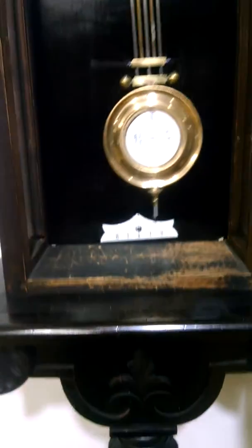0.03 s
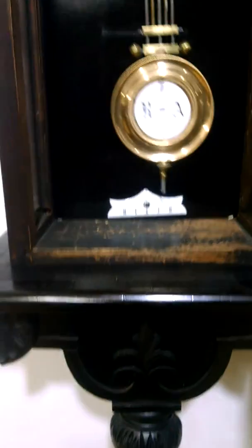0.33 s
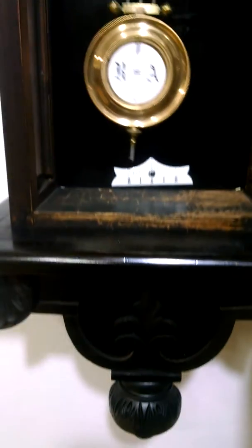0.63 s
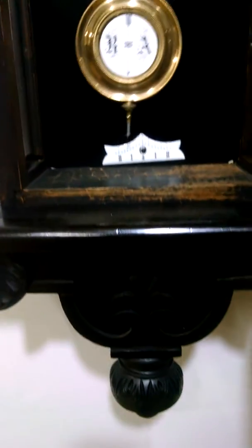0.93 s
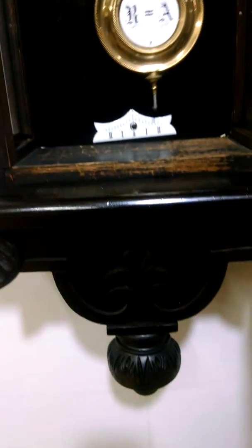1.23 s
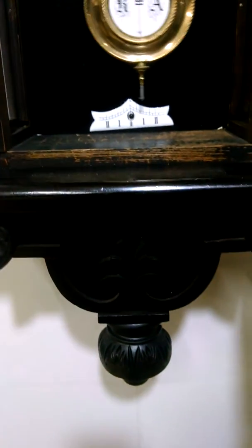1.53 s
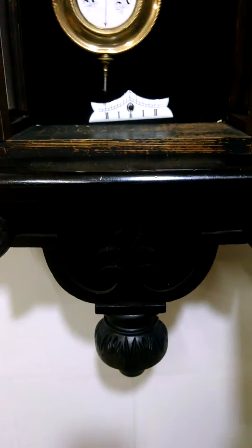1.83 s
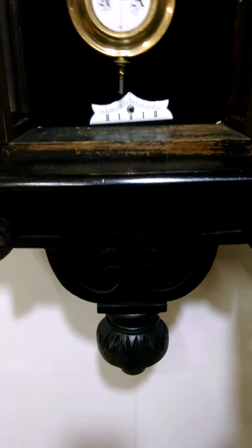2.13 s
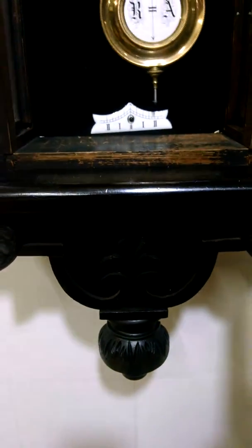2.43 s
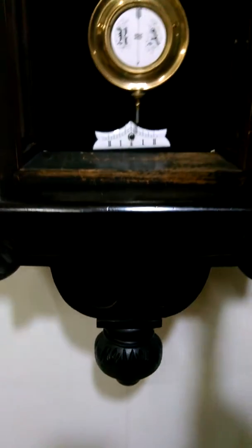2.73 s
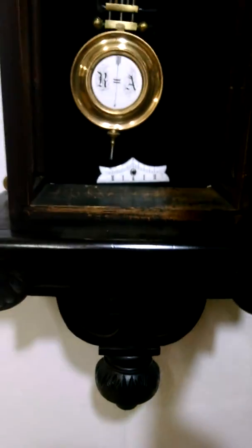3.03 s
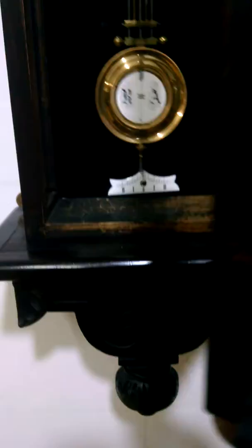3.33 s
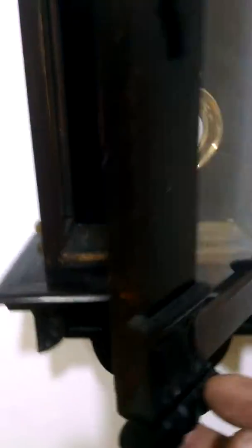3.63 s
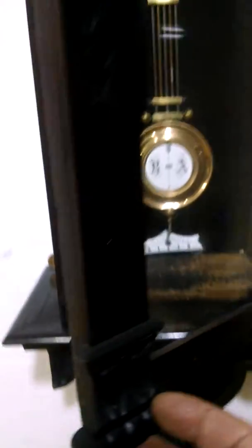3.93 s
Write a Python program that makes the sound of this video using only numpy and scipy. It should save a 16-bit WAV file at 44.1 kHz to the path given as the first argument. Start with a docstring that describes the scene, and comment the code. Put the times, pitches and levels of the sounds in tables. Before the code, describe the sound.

A pendulum wall clock ticks throughout, slightly unevenly, about every 0.6 seconds, each tick a quick double blow of steel and wood. The quiet room has faint hum, hiss and tiny static clicks, with a soft tone swelling at 0.8 and 1.6 seconds. From 2.3 to 2.9 seconds a hand rubs and bumps the microphone. From about 3.3 seconds the clock's wooden door swings softly.

```python
"""From the start, a pendulum wall clock ticks slightly unevenly in a quiet room, over faint hum and hiss.
Each tick is two quick blows of the escapement (the catch on the toothed wheel), ringing steel and wood.
Faint static crackles now and then, and a soft tone swells twice. After two seconds a hand rubs and
bumps the camera that holds the microphones. In the last second the clock's door swings softly.
The recorder spreads all of this wider between left and right."""
import sys
import numpy as np
from scipy import signal
from scipy.fft import rfft, irfft
from scipy.io import wavfile
from scipy.ndimage import uniform_filter1d

SR = 44100
rng = np.random.default_rng(int(sys.argv[2]) if len(sys.argv) > 2 else 0)


def waveform_to_disk(signal):
    """Save audio, clipped to [-1, 1], as 16-bit WAV at the path in sys.argv[1]."""
    frames = np.transpose(np.atleast_2d(signal))
    scaled = np.clip(frames, -1, 1) * 32767
    samples = np.round(scaled).astype(np.int16)
    wavfile.write(sys.argv[1], SR, samples)


N = 176400
TIME, FREQ = np.arange(N) / SR, np.fft.rfftfreq(N, 1 / SR)
RING_TIME = np.arange(SR // 5) / SR  # time axis for one short sound

# A spectrum gives the level in each 1 Hz band. A fade (T60) is the time taken to drop by 60 dB.
# steady background rumble and hiss, with a narrow dip near 2700 Hz: f/Hz, level/dB
BACKGROUND_SPECTRUM = [(20, -79), (60, -73.5), (130, -75.5), (215, -81), (330, -78.5), (480, -81),
                       (660, -85), (780, -87), (1050, -90), (1300, -94), (1550, -88.5), (2000, -87),
                       (2400, -93.5), (2680, -100), (2950, -95), (3300, -99), (3950, -102), (4300, -99),
                       (5500, -102), (8500, -104.6), (12000, -102.8), (15500, -104.5)]
# how alike it is left and right: f/Hz, likeness (1 = same, -1 or less = opposite)
BACKGROUND_LIKENESS = [(60, 0.59), (200, 0.71), (450, 0.56), (1200, 0.71), (1550, 0.095), (1900, -0.32),
                       (2500, -0.59), (2720, -1.35), (2900, 0.75), (3700, 0.11), (4000, 0.21),
                       (4300, -0.44), (5500, -0.048), (15000, 0.007)]
# how much louder it is on the left: f/Hz, level/dB
BACKGROUND_BALANCE = [(200, .5), (400, -1.5), (1300, 0.5), (1900, -4.5), (2700, 1), (8000, 0.5),
                      (11000, -2.5)]
# slow drift of the background and hum: t/s, level/dB
BACKGROUND_DRIFT = [(0, 1), (.7, .5), (1.5, -1.23), (2.2, 0.5), (3.1, -0.86), (4, 1)]
# faint hum and electrical whine: f/Hz, level/dB
HUM_TONES = [(48, -63), (180, -71), (282, -73), (320, -65.5), (457, -73), (525, -66.5), (668, -67.5),
             (1509, -77.5), (7635, -87)]
# brief swells of a faint tone: t/s, f/Hz, level/dB
TONE_SWELLS = [(.755, 685, -51.5), (1.6, 638, -55.5)]
# static in the recorder: t/s, level/dB
STATIC_CLICKS = [(.1578, -1), (.6726, 1), (.822, -1), (1.3894, -1), (1.7794, -1), (2.3249, -1),
                 (2.5032, -1), (2.7004, -1), (2.8199, 1), (3.0884, 0), (3.2832, -3), (3.4376, -1),
                 (3.4842, -1), (3.8316, -1)]
# the swinging door: f/Hz, level/dB
DOOR_SPECTRUM = [(120, -100), (230, -81.5), (370, -70.5), (500, -91), (640, -77), (780, -91), (1080, -88),
                 (1400, -99), (1800, -89.5), (3000, -112), (8000, -125)]
# its loudness: t/s, level/dB
DOOR_LOUDNESS = [(3.0, -34), (3.26, -18), (3.48, -13), (3.57, -2), (3.8, -3.5), (3.86, -12), (4, 0.5)]
# low rub of fingers on the camera: f/Hz, level/dB
RUB_SPECTRUM = [(30, -88), (110, -65), (150, -68), (195, -65.5), (255, -66.5), (310, -68.5), (390, -72),
                (520, -67), (720, -74), (1050, -87), (2000, -102), (5000, -120)]
# how hard they press: t/s, level/dB
FINGER_PRESSURE = [(2.25, -60), (2.284, -20), (2.298, -1.5), (2.345, -10.5), (2.41, -10), (2.48, -7.5),
                   (2.535, -1), (2.545, 0.5), (2.67, 0.5), (2.715, -2.5), (2.74, -11), (2.85, -9),
                   (2.88, -15), (3, -60)]
# brighter scrape of the fingers: f/Hz, level/dB
SCRAPE_SPECTRUM = [(500, -100), (900, -90), (1350, -80.5), (1440, -82.5), (1510, -79), (1620, -85),
                   (2000, -84.5), (2700, -102), (3030, -87), (3250, -101), (6000, -107), (15000, -112)]
# its loudness: t/s, level/dB
SCRAPE_LOUDNESS = [(2.2, -62), (2.29, -41), (2.5, -9), (2.56, -1), (2.64, -3.5), (2.715, 1.5),
                   (2.735, -6.5), (2.95, -25)]
# bumps of the hand: t/s, level/dB
HAND_BUMPS = [(2.366, -8), (2.439, 3), (2.469, -15), (2.495, 3), (2.542, 4.5), (2.564, 2), (2.585, 5),
              (2.638, -7), (2.82, -6)]
# tones of the bumped camera body: f/Hz, level/dB, fade/s
CAMERA_TONES = [(116, -66, 0.039), (198, -38.5, 0.032), (228, -37, 0.041), (526, -49, 0.023),
                (770, -39, 0.018)]
# tones of the clock's steel catches and axles: f/Hz, level/dB, fade/s
STEEL_TONES = [(6310, -52.5, .028), (6540, -54, .017), (7720, -63, .016), (7900, -58, 0.018)]
# tones of the clockwork and wooden case: f/Hz, level/dB, fade/s
CASE_TONES = [(393, -40, 0.018), (660, -48, 0.047), (1216, -52.5, 0.054), (1950, -50, 0.042),
              (2545, -63, 0.12), (2974, -50, 0.073), (3426, -53, 0.027)]
# dry rattle of each blow: f/Hz, level/dB
CLACK_SPECTRUM = [(200, -74), (800, -72), (1500, -82.5), (2500, -78.5), (3700, -83), (5300, -90),
                  (8000, -88.5), (10000, -92.5), (15000, -106)]
# the ticks: t/s, case level/dB, steel level/dB, second blow delay/s, second blow level/dB,
# wheel f/Hz, plate f/Hz, plate level/dB, back board level/dB
CLOCK_TICKS = [(.0463, -2.5, -2, 0.0031, 2, 6391, 2250, -49, -63),
               (.6545, -1, 2, 0.0097, -14, 6440, 2170, -44.5, -48),
               (1.1894, 0, -11, 0.0038, -3, 6490, 2260, -48, -60),
               (1.8199, -0.5, 1.5, 0.0039, -6, 6500, 2240, -45.5, -46),
               (2.3875, -0.5, 0, .0035, -13, 6514, 2240, -45, -52.5),
               (2.9821, -5, -3.5, 0.0032, 2.5, 6380, 2277, -50, -45.5),
               (3.5314, -4.5, -4, .002, -1, 6417, 2280, -48, -62)]
# stereo widening: f/Hz, share of the other channel taken away
WIDEN_SHARE = [(200, 0.24), (1200, 0.38), (2700, 0.55), (4000, 0.78), (5400, 0.3), (8200, 0.42),
               (11000, 0.25), (15000, 0.19)]


def amp(db):
    """Turns decibels into a number to multiply by."""
    return 10 ** (np.asarray(db) / 20)


def evened(x):
    """Scales a sound to an average power of 1."""
    return x / np.sqrt(np.mean(x ** 2) + 1e-20)


def curve(points):
    """Joins a table's points into a value for every frequency, on a log scale."""
    hz, value = np.transpose(points)
    return np.interp(np.log(FREQ + 1), np.log(hz), value)


def level(points):
    """Joins (t/s, level/dB) points into a volume curve."""
    return amp(np.interp(TIME, *np.transpose(points)))


def pan(db):
    """Raises the left channel and lowers the right."""
    return amp([[db], [-db]])


def add(mix, start, sound):
    """Mixes a sound in at a start time in seconds."""
    part = mix[:, round(start * SR):][:, :sound.shape[-1]]
    part += sound[..., :part.shape[1]]


def colour(white, spectrum):
    """Shapes white noise to a spectrum."""
    return irfft(rfft(white) * amp(curve(spectrum)) * np.sqrt(SR / 2), N)


def pair(x, likeness):
    """Makes two unrelated channels partly alike."""
    left, right = rfft(x)
    likeness = np.clip(likeness, -1, 1)
    return irfft(np.array([left, likeness * left + np.sqrt(1 - likeness ** 2) * right]), N)


def background():
    """A low rumble drifts in patches under a steady hiss, with a faint wavering hum."""
    bands, _, noise = signal.stft(rng.standard_normal((2, N)), SR, nperseg=1024)
    depth_db = 1 / (1 + (bands[:, None] / 3020) ** 2)  # high bands barely drift
    patches = uniform_filter1d(rng.standard_normal(noise.shape[1:]), size=8, axis=0)
    patches = evened(uniform_filter1d(patches, size=10, axis=1))
    white = evened(signal.istft(noise * amp(depth_db * patches), nperseg=1024)[1][:, :N])
    wash = colour(pair(white, curve(BACKGROUND_LIKENESS)), BACKGROUND_SPECTRUM)
    lean_db = curve(BACKGROUND_BALANCE) / 2
    wash = irfft(rfft(wash) * amp([lean_db, -lean_db]), N)
    hum_noise, width_hz = rfft(rng.standard_normal(N)), 6
    hum = sum(amp(db) * evened(irfft(hum_noise / (1 + ((FREQ - hz) / width_hz) ** 2), N))
              for hz, db in HUM_TONES)
    return (wash + hum) * level(BACKGROUND_DRIFT)


def swell(peak_s, hz, db, width_s):
    """A pure tone grows and dies away smoothly."""
    return amp(db) * np.exp(-((TIME - peak_s) / width_s) ** 2) * np.sin(2 * np.pi * hz * TIME)


def static():
    """Static in the recorder makes thin, very high clicks on the right."""
    clicks = np.zeros((2, N))
    for start, db in STATIC_CLICKS:
        add(clicks, start, amp(db - 26.7) * np.array([[0], [1]]))
    return signal.sosfilt(signal.butter(1, [9700, 14500], "band", fs=SR, output="sos"), clicks)


def slips(per_second=2500, spread_db=2.5):
    """Rubbing surfaces stick and let go in tiny jerks of uneven size."""
    size = amp(spread_db * np.minimum(rng.exponential(1, (2, N)), 4))
    direction = rng.choice([-1, 1], (2, N))
    slipping = rng.random((2, N)) < per_second / SR
    return pair(evened(size * direction * slipping), likeness=0.75)


def door():
    """Wood rubs softly as the clock's door swings."""
    return colour(slips() * level(DOOR_LOUDNESS), DOOR_SPECTRUM)


def hand(thud_rise_s=0.0013):
    """Fingers slide over the camera, knock its body and squeak once."""
    body = colour(slips() * level(FINGER_PRESSURE), RUB_SPECTRUM)
    thud = sum(amp(db - 60 * RING_TIME / t60) * np.sin(2 * np.pi * hz * RING_TIME)
               for hz, db, t60 in CAMERA_TONES)
    thud *= 1 - np.exp(-RING_TIME / thud_rise_s)
    for start, db in HAND_BUMPS:
        add(body, start, amp(db) * thud)
    scrape = colour(slips() * level(SCRAPE_LOUDNESS), SCRAPE_SPECTRUM)
    squeak = swell(peak_s=2.551, hz=3620, db=-59, width_s=0.005)
    return pan(db=3) * body + scrape + squeak


def room_echo(sound, db=-12, t60_s=0.093, delay_s=0.006):
    """The room throws back a short blur of echoes, different at each microphone."""
    tail = rng.standard_normal((2, len(RING_TIME))) * amp(-60 * RING_TIME / t60_s)
    tail *= RING_TIME > delay_s
    return amp(db) * signal.fftconvolve(sound, tail / np.linalg.norm(tail[0]), axes=1)[:, :N]


def ring(tones, blows, rise_s):
    """A struck part rings at its own tones; each blow (delay/s, level/dB) adds energy that fades."""
    out = np.zeros((2, len(RING_TIME)))
    for hz, db, t60 in tones:
        energy = 0
        for delay, blow_db in blows:
            age = np.maximum(RING_TIME - delay, 0)
            energy += ((1 - np.exp(-age / rise_s)) * amp(db + blow_db - 60 * age / t60)) ** 2
        shift_cycles = 0.19 * rng.random((2, 1))  # the two microphones are a little out of step
        out += np.sqrt(energy) * np.sin(2 * np.pi * (hz * RING_TIME + shift_cycles))
    return out


def escapement():
    """Two quick blows per tick ring the steel and the case and clack; each tooth sounds a bit different."""
    wheel_db, wheel_t60_s, plate_t60_s = -39.5, 0.022, 0.062
    board_hz, board_t60_s = 903, 0.074
    clack_rise_s, clack_t60_s = 0.00032, 0.033
    clack_shape = (1 - np.exp(-RING_TIME / clack_rise_s)) * amp(-60 * RING_TIME / clack_t60_s)
    ringing, clack_energy = np.zeros((2, N)), np.zeros((1, N))
    for start, case_db, steel_db, gap, second_db, wheel_hz, plate_hz, plate_db, board_db in CLOCK_TICKS:
        blows = [(0, 0), (gap, second_db)]
        steel = STEEL_TONES + [(wheel_hz, wheel_db, wheel_t60_s)]
        case = CASE_TONES + [(plate_hz, plate_db, plate_t60_s), (board_hz, board_db, board_t60_s)]
        add(ringing, start, amp(steel_db) * pan(db=4.5) * ring(steel, blows, rise_s=0.0011))
        add(ringing, start, amp(case_db) * ring(case, blows, rise_s=0.002))
        for delay, db in blows:
            add(clack_energy, start + delay, (amp(case_db + db) * clack_shape) ** 2)
    return ringing + np.sqrt(clack_energy) * colour(rng.standard_normal((2, N)), CLACK_SPECTRUM)


def scene():
    """The clock in its room, with the hand, the door and the static."""
    clock = escapement()
    swells = sum(swell(peak_s, hz, db, width_s=0.028) for peak_s, hz, db in TONE_SWELLS)
    return clock + room_echo(clock) + background() + swells + hand() + door() + static()


def record(dry):
    """Each side loses a delayed share of the other, which sounds wider; the highest treble is cut."""
    delay_s, cutoff_hz = 0.000363, 15750
    channels, share = rfft(dry), np.clip(curve(WIDEN_SHARE), 0, 1)
    other_side = np.exp(-2j * np.pi * FREQ * delay_s) * channels[::-1]
    wide = irfft((channels - share * other_side) / np.sqrt(1 + share ** 2), N)
    treble_cut = signal.firwin(511, cutoff_hz, window=("kaiser", 9), fs=SR)
    return signal.oaconvolve(wide, treble_cut[None], "same")


dry = scene()
out = record(dry)
waveform_to_disk(out)
```